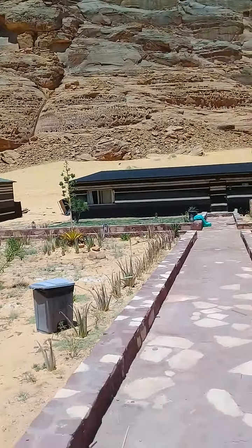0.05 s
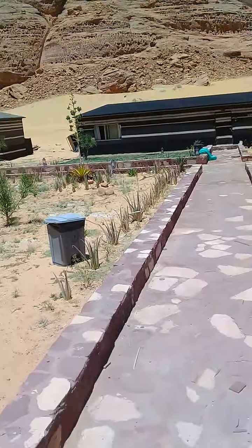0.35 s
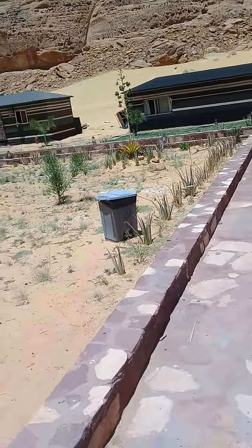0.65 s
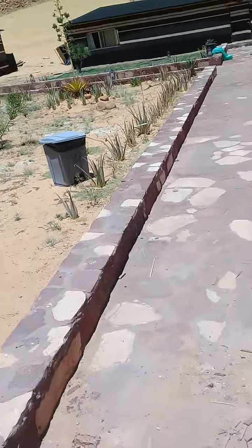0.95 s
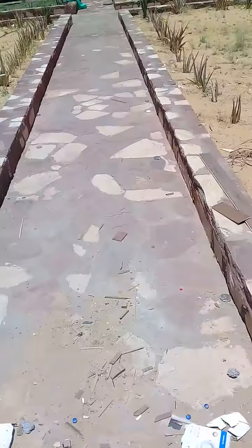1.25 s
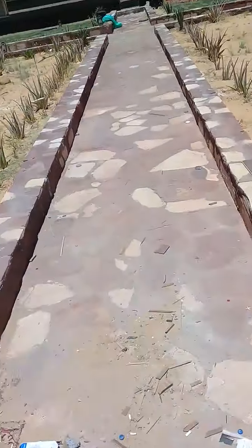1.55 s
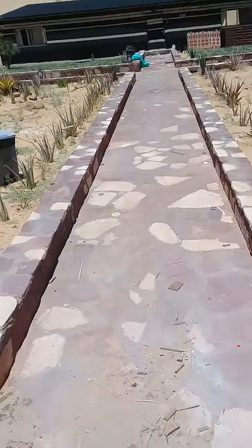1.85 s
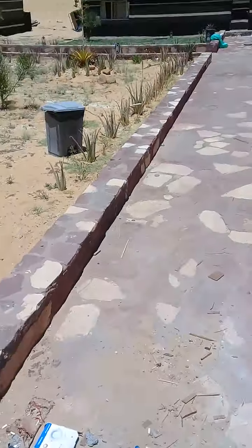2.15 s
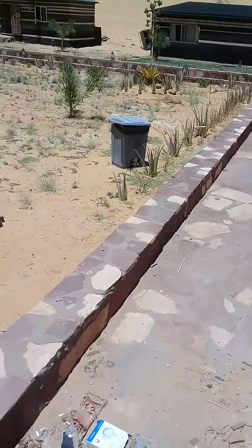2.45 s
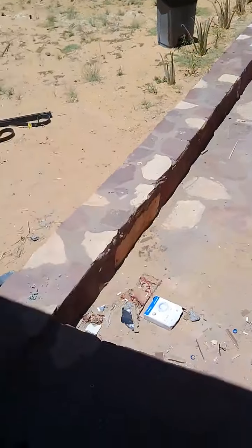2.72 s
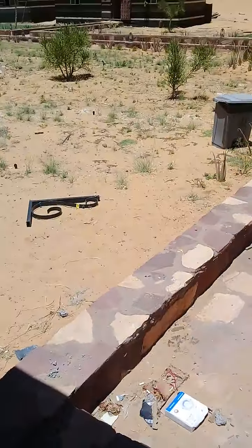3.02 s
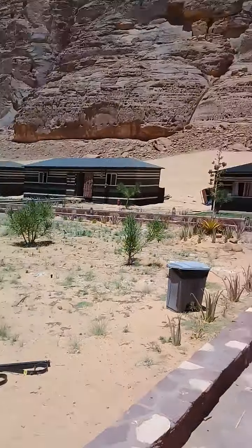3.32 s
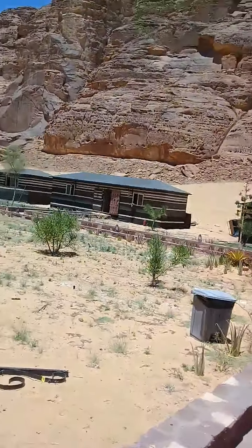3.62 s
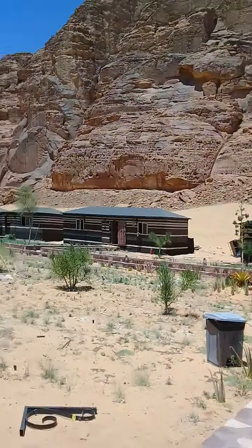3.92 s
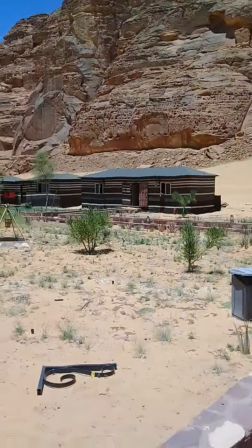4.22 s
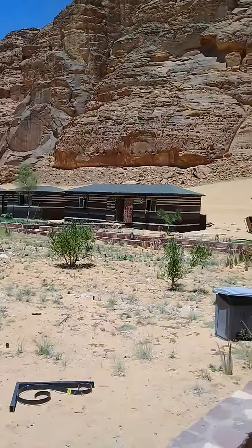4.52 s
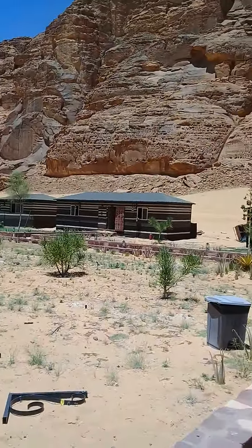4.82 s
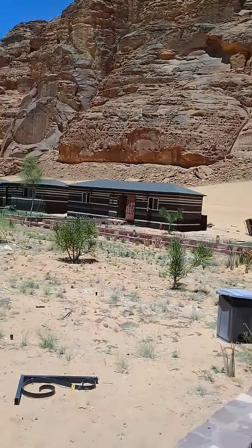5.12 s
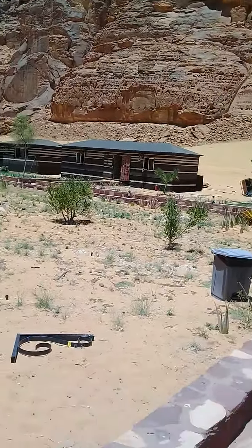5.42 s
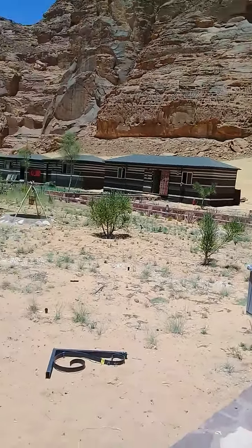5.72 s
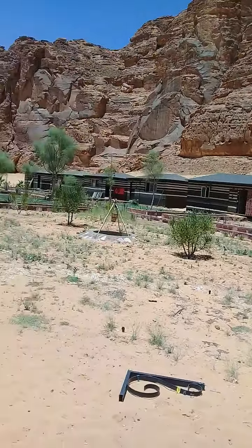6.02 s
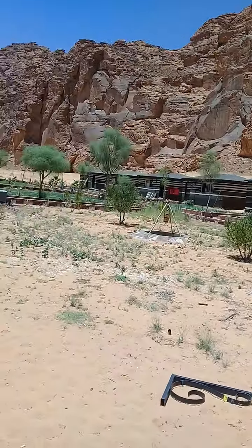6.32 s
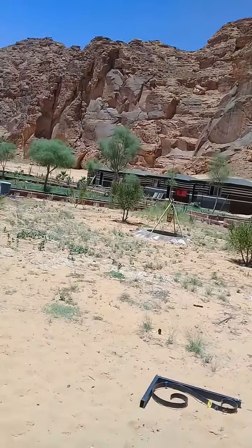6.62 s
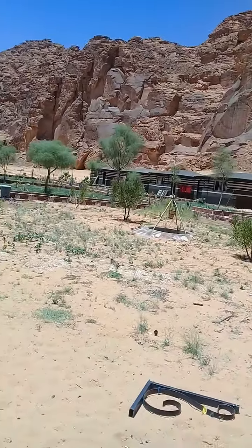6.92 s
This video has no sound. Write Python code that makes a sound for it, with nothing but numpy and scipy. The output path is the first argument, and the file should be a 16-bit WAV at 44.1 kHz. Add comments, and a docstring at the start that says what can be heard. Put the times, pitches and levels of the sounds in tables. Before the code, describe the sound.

Someone shuffles and turns on sand-covered stone in a quiet, open desert place, soles rasping and grit ticking underfoot. The scrapes build to a sandy slide, then a knock with a tiny bright chink as wind buffets the handheld microphone. Afterwards the movement softens to rustling cloth and sand with occasional dull thuds. Still air and a faint low hum lie underneath.

```python
"""Shoes scuff on sandy paving as someone shuffles and turns, phone in hand, in a quiet desert camp.
Each scuff is a swell of sliding grains. Footfalls and handling knocks thud; sleeve and sand rustle,
with one hissing sandy drag; grit ticks and a small hard piece chinks once. Movement and gusts
flutter the air at the microphone port, over still air and a faint low drone. Open ground, no echo."""
import sys
import numpy as np
from scipy import signal
from scipy.fft import rfft, irfft, next_fast_len
from scipy.io import wavfile
from scipy.ndimage import uniform_filter1d

SR = 44100
rng = np.random.default_rng(int(sys.argv[2]) if len(sys.argv) > 2 else 0)


def pcm_store(signal):
    """Save signal as 16-bit PCM."""
    levels = np.round(np.clip(np.atleast_2d(signal), -1, 1) * 32767)
    wavfile.write(sys.argv[1], SR, levels.astype(np.int16).T)


N = 311566
TIME = np.arange(N) / SR

# rustle of sleeve and sand (sandy drag at 3.41-4.03 s), one curve per bout: time_s, level_db
RUSTLE_BOUTS = [
    [(2.39, -48.5), (2.462, -62.5), (2.598, -60.5), (2.632, -50.5), (2.67, -57), (2.77, -61), (2.812, -63),
     (2.82, -57.5)],
    [(3.41, -32.5), (3.592, -38.5), (3.598, -40), (3.716, -43), (3.748, -47.5), (3.806, -46), (3.836, -49),
     (4.03, -38.5)],
    [(4.14, -49), (4.202, -60.5), (4.326, -52.5), (4.352, -58), (4.464, -47.5), (4.634, -58.5),
     (4.646, -66), (4.93, -83)],
    [(4.96, -78), (4.972, -62), (5.038, -71), (5.138, -49), (5.172, -59), (5.318, -41.5), (5.618, -43.5),
     (5.66, -48.5)],
    [(5.66, -51), (5.686, -38), (5.784, -35.5), (5.84, -40.5), (5.874, -32.5), (5.914, -34), (5.94, -41.5)],
    [(5.94, -43), (5.974, -43), (5.982, -38), (6.13, -54), (6.23, -40.5), (6.304, -60), (6.326, -48),
     (6.44, -61)],
    [(6.44, -67), (6.444, -62), (6.576, -56), (6.67, -70), (6.762, -54.5), (6.896, -61.5), (6.902, -63.5),
     (7.04, -54.5)],
]


def scuffs(body_hz=410, body_oct_per_db=0.0557, usual_sand_db=-11, judder_db=1.0, slip_db=2.5):
    """Soles slide: grains rasp, fine sand hisses, the pressed surface sounds hollow."""
    # peak_s, rise_s, fall_s, rasp_db, rasp_hz, body_db, sand_db (last two re rasp)
    strokes = [(0.196, .052, 0.029, -20.5, 1610, -1.5, -16.5), (0.289, 0.064, 0.027, -27.5, 2200, -15, -33),
               (0.33, 0.017, 0.043, -32.5, 1600, -1, -16), (0.393, 0.033, 0.15, -30, 1960, -7, -18),
               (0.507, 0.0052, 0.019, -40, 1700, 13.5, -16), (0.58, .04, .07, -59, 3000, 6.5, -9),
               (0.748, 0.067, 0.016, -51, 3300, 9, -15), (0.822, 0.031, 0.027, -38, 1910, 8, -21),
               (0.927, 0.039, 0.047, -51, 2170, 11.5, -8), (1.039, .006, .057, -47.5, 2600, 15, -24),
               (1.126, 0.036, 0.0094, -36.5, 2600, -2, -5), (1.238, 0.083, 0.092, -34, 1840, -3.5, -8),
               (1.363, 0.03, 0.14, -33, 2000, 3, -9), (1.451, 0.049, .017, -20, 2370, 4, -10.5),
               (1.561, 0.079, .061, -27.5, 2050, -3, -10.5), (1.687, 0.041, .028, -34.5, 1770, 6, -14),
               (1.712, 0.014, 0.045, -17, 1510, -5, -9.5), (1.969, 0.12, 0.16, -40, 1740, -4, -11),
               (2.091, 0.051, 0.014, -29.5, 1930, -3, -10), (2.132, 0.023, 0.085, -40.5, 2200, 6.5, -10),
               (2.201, .015, 0.042, -43, 1530, 9, -23), (2.262, 0.022, 0.052, -21, 1460, -1.5, -8.5),
               (2.346, 0.11, 0.07, -30.5, 2200, 0.5, -5), (2.956, 0.025, .039, -39.5, 2000, 10.5, -15),
               (3.002, 0.052, 0.026, -27.5, 2060, -2, -6), (3.103, 0.037, 0.043, -17, 2200, 2.5, -8),
               (3.248, 0.024, 0.048, -28.5, 1110, 18.5, -31),
               (3.278, 0.047, 0.026, -21.5, 1500, -12, -10.5), (3.32, 0.18, 0.13, -21.5, 2130, -6, -2.5),
               (3.345, 0.02, 0.043, -33.5, 1300, 15, -24), (3.377, 0.046, 0.029, -17.5, 1560, 0, -7),
               (3.615, 0.03, 0.029, -35, 1500, 14.5, -25), (4.061, .075, 0.083, -35.5, 2900, 17.5, -5),
               (5.885, 0.059, 0.05, -29.5, 1880, 4.5, -23), (5.99, .02, .04, -41, 2600, 3, -14)]
    out = np.zeros(N)
    coarse = grains(share=0.1, spread_db=1.5)
    medium = grains(share=0.3, spread_db=1.0)
    fine = grains(share=0.98, spread_db=2.5)
    medium = lowpass(medium, hz=5200, order=4)  # grain contact time limits the treble
    judder = unit(undb(judder_db * walk(rate_hz=350)))  # contact catches and lets go
    pressure = unit(undb(slip_db * walk(rate_hz=110)))
    for peak_s, rise_s, fall_s, rasp_db, rasp_hz, body_db, sand_db in strokes:
        span = slice(max(int((peak_s - 2 * rise_s) * SR), 0), min(int((peak_s + 2 * fall_s) * SR), N))
        extra_sand_db = sand_db - usual_sand_db  # sandier: higher body, slightly narrower rasp
        hollow_hz = body_hz * 2 ** (body_oct_per_db * extra_sand_db)
        rasp = resonate(medium[span], rasp_hz, q=0.51 * 2 ** (0.01 * extra_sand_db))
        body = undb(body_db) * resonate(coarse[span], hollow_hz, q=0.53) * pressure[span]
        hiss = undb(sand_db) * resonate(fine[span], hz=9500, q=0.37)
        out[span] += undb(rasp_db) * swell(TIME[span] - peak_s, rise_s, fall_s) * (rasp + body + hiss)
    return out * judder


def crunch(slides, gain_db=-13):
    """Coarse grains break under a slide, harder when it is louder."""
    treble = colour(slides, [(300, -20), (1500, 0)])
    effort = np.sqrt(np.abs(uniform_filter1d(treble ** 2, size=SR // 50)))
    breaks = grains(share=0.03, spread_db=2.4)
    return undb(gain_db) * effort * resonate(breaks, hz=2600, q=0.77)


def contact(part_s=0.003, return_s=0.019):
    """Slide gain: drops as the rubbing surfaces part, recovers as they meet again."""
    # start_s, depth_db
    lifts = [(0.526, 9), (1.46, 10), (1.747, 19), (2.099, 8), (2.384, 7), (4.084, 17), (5.927, 9.5)]
    gain_db = np.zeros(N)
    for start_s, depth_db in lifts:
        t = np.maximum(TIME - start_s, 0)
        gain_db -= depth_db * (1 - np.exp(-t / part_s)) * np.exp(-(t / return_s) ** 2)
    return undb(gain_db)


def knocks(decay_cycles=0.53, sag_per_cycle=0.053, slap_decay_s=0.0016):
    """Damped thuds sag in pitch as the load eases; hard contacts slap, soft ones build slowly."""
    # footfalls and handling knocks: start_s, level_db, pitch_hz, softness (0 = hard)
    impacts = [(0.0856, -14, 1510, 0.035), (0.1996, -9, 365, 0.73), (1.0851, -8.5, 368, 0.28),
               (1.126, -6.5, 570, 0.058), (1.429, -13.5, 450, .15), (1.4454, -7, 132, 0.49),
               (2.1147, -15, 530, .1), (2.1154, -9.5, 119, 0.53), (2.936, -18, 110, 0.63),
               (3.242, -4.5, 232, 0.16), (3.2497, -7, 290, 0.83), (3.336, -8, 249, 0.56),
               (3.377, -7, 318, 0.55), (3.453, -16, 121, 0.75), (3.6106, -13.5, 392, 0.94),
               (3.624, -8.5, 94, 0.62), (4.0661, -3.5, 223, .12), (4.0897, 2.5, 580, 0.1),
               (4.093, -5.5, 119, 0.76), (4.246, -20, 169, 0.33), (4.608, -27, 111, .8),
               (4.779, -29, 149, 1), (5.4426, -9, 152, 0.76), (5.4444, -11.5, 342, 0.8),
               (6.094, -6, 310, 0.14), (6.101, -17, 80.6, 0.67), (6.145, -28, 65, 0.82),
               (6.544, -24.5, 73.6, .9)]
    out, t = np.zeros(N), TIME[:SR // 8]
    for start_s, level_db, pitch_hz, softness in impacts:
        cycles = pitch_hz * t
        envelope = cycles ** softness * np.exp(-cycles / decay_cycles)
        thud = envelope * np.sin(2 * np.pi * cycles / (1 + sag_per_cycle * cycles))
        slap = undb(-8 - 18 * softness) * burst(t, slap_decay_s, hz=1000, q=0.67)
        add(out, undb(level_db) * (thud / np.abs(thud).max() + slap), start_s)
    return lowpass(out, hz=3000)  # rubber and skin are too soft for high treble


def rustle_motion(settle_s=0.032):
    """Briskness of the rustle as a gain; dies away after each bout."""
    gain = np.zeros(N)
    for bout in RUSTLE_BOUTS:
        time_s, level_db = np.transpose(bout)
        settle = np.exp(-np.maximum(TIME - time_s[-1], 0) / settle_s)
        gain = np.where(TIME >= time_s[0], undb(np.interp(TIME, time_s, level_db)) * settle, gain)
    return np.abs(uniform_filter1d(gain, size=SR // 100))


def rustle(motion, rasp_db=2, body_db=-2, flutter_db=1.88):
    """Sleeve and sand rasp and hiss, hollower when slow; the second bout is a hissing sandy drag."""
    # fine hiss per bout, re its level: gain_db
    hiss_db = [-0.5, -2.5, -8, -11, -12, -11, -12]
    starts_s = [bout[0][0] for bout in RUSTLE_BOUTS]
    bout_index = np.maximum(np.searchsorted(starts_s, TIME) - 1, 0)
    friction = lowpass(grains(share=0.3, spread_db=1.5), hz=5600)
    rasp = undb(rasp_db) * resonate(friction, hz=1900, q=0.48)
    hiss = undb(hiss_db)[bout_index] * resonate(rng.standard_normal(N), hz=9500, q=0.5)
    body = undb(body_db) * resonate(grains(share=0.1, spread_db=1.5), hz=520, q=0.4)
    flutter = unit(undb(flutter_db * walk(rate_hz=40)))
    return (motion * (rasp + hiss) + motion ** 0.8 * body) * flutter


def hand_rubs(half_width_hz=70):
    """Rubbing noise rings in the air pocket under the hand, gliding as the gap changes."""
    # start_s, length_s, level_db, first_hz, last_hz
    glides = [(1.913, .085, -41, 881, 1027), (2.001, 0.08, -39, 914, 748), (2.589, .21, -52, 801, 1135),
              (4.014, 0.061, -23, 520, 820), (5.701, 0.0995, -26.5, 201, 399)]
    out = np.zeros(N)
    for start_s, length_s, level_db, first_hz, last_hz in glides:
        size = int(length_s * SR)
        drive = lowpass(rng.standard_normal((SR // 4, 2)), half_width_hz)[:size]
        phase = 2 * np.pi * np.cumsum(np.linspace(first_hz, last_hz, size)) / SR
        note = unit(drive[:, 0] * np.cos(phase) + drive[:, 1] * np.sin(phase))
        add(out, undb(level_db) * note * signal.windows.tukey(size, 0.5), start_s)
    return out


def grit_ticks(decay_s=0.00046):
    """Single grains give way underfoot, each with a brief broad crack."""
    # start_s, peak_db, pitch_hz
    cracks = [(0.154, -14, 980), (0.505, -21.5, 890), (0.785, -35, 2000), (0.815, -24, 900),
              (1.036, -27.5, 1200), (1.067, -24, 600), (1.125, -11.5, 3120), (1.495, -20, 1600),
              (1.648, -25, 2500), (1.671, -22, 1100), (2.115, -21, 1300), (2.834, -32, 1810),
              (3.679, -16.5, 2190), (3.774, -17, 1100), (6.17, -30, 3500), (6.261, -27, 2200),
              (6.509, -38, 1500), (6.787, -33.5, 6000), (6.885, -27.5, 1200)]
    out, t = np.zeros(N), TIME[:SR // 32]
    for start_s, peak_db, pitch_hz in cracks:
        add(out, undb(peak_db) * burst(t, decay_s, pitch_hz, q=0.65), start_s)
    return out


def chink(start_s=4.0688):
    """A small hard piece, struck by the shoe, rings in short bright modes."""
    # pitch_hz, peak_db, t60_s
    modes = [(2710, -14, 0.022), (3700, -36, 0.01), (6600, -28, 0.034), (6800, -35, .03)]
    out, t = np.zeros(N), TIME[:SR // 10]
    for pitch_hz, peak_db, t60_s in modes:
        add(out, undb(peak_db - 60 * t / t60_s) * np.sin(2 * np.pi * pitch_hz * t), start_s)
    return out


def wind(motion, breeze_db=-55, stirred_db=-6, flutter_db=4.0):
    """Eddies at the microphone port: light breeze, air stirred by movement, gusts."""
    # peak_s, half_length_s, level_db
    gusts = [(1.183, .15, -41), (1.51, 0.22, -35.5), (2.2, 0.24, -35), (3.195, .1, -35), (3.74, 0.29, -27),
             (4.014, 0.17, -21.5), (5.35, 0.43, -37), (6.295, 0.11, -44), (7.0, .35, -44)]
    # freq_hz, gain_db
    eddy_spectrum = [(20, -37), (40, -0.5), (75, -2), (125, 1.5), (190, -1.5), (300, -9), (600, -17),
                     (2000, -77.5)]
    power = undb(breeze_db) ** 2 + (undb(stirred_db) * motion ** 0.75) ** 2
    for peak_s, half_length_s, level_db in gusts:
        power += (undb(level_db) * swell(TIME - peak_s, half_length_s, half_length_s)) ** 2
    eddies = colour(rng.standard_normal(N), eddy_spectrum)
    flutter = undb(flutter_db * walk(rate_hz=55))
    return unit(eddies * flutter) * np.sqrt(power)


def camp(air_db=-51, drone_db=-51, waver_db=1.0):
    """Still desert air and a faint low drone, perhaps a far generator."""
    # freq_hz, gain_db
    air_spectrum = [(20, -17), (55, -12.5), (100, -6), (230, 1), (420, -2), (700, -4.5), (1150, -8.5),
                    (1900, -13.5), (2900, -18), (6300, -28), (9000, -34), (15000, -39)]
    waver = undb(waver_db * walk(rate_hz=14))
    air = unit(colour(rng.standard_normal(N), air_spectrum)) * waver
    drone = resonate(rng.standard_normal(N), hz=56.4, q=6)
    return undb(air_db) * air + undb(drone_db) * drone


def grains(share, spread_db):
    """Dense tiny impacts on a share of the samples: many weak, a few strong."""
    strength = undb(spread_db * np.minimum(rng.exponential(size=N), 6))
    return rng.standard_normal(N) * strength * (rng.random(N) < share)


def burst(t, decay_s, hz, q):
    """Decaying noise through a resonance; peak 1."""
    noise = resonate(rng.standard_normal(len(t)) * np.exp(-t / decay_s), hz, q)
    return noise / np.abs(noise).max()


def swell(t, rise_s, fall_s):
    """Gain peaking at t = 0; 20 dB down at -rise_s and at fall_s."""
    distance = np.abs(t / np.where(t < 0, rise_s, fall_s))
    return undb(-20 * distance ** np.where(t < 0, 1.39, 1.48))


def walk(rate_hz):
    """Random wander, rate_hz new goals a second; rms 1."""
    goals = rng.standard_normal(N // 16)
    return unit(np.interp(TIME * rate_hz, np.arange(len(goals)), goals))


def resonate(x, hz, q):
    """Band-pass applied twice for steep skirts; rms 1."""
    size = next_fast_len(len(x))
    ratio = np.maximum(np.fft.rfftfreq(size, 1 / SR), 1) / hz
    return unit(irfft(rfft(x, size) / (1 + 1j * q * (ratio - 1 / ratio)) ** 2, size)[:len(x)])


def colour(x, points):
    """Filter by a curve of (freq_hz, gain_db) points."""
    freq_hz, gain_db = np.transpose(points)
    size = next_fast_len(len(x))
    bins_hz = np.maximum(np.fft.rfftfreq(size, 1 / SR), 1)
    gain = undb(np.interp(np.log(bins_hz), np.log(freq_hz), gain_db))
    return irfft(rfft(x, size) * gain, size)[:len(x)]


def lowpass(x, hz, order=2):
    return signal.sosfilt(signal.butter(order, hz, fs=SR, output="sos"), x, axis=0)


def undb(db):
    return 10 ** (np.asarray(db) / 20)


def unit(x):
    """Scale to rms 1."""
    return x / np.sqrt(np.mean(x ** 2) + 1e-18)


def add(track, sound, start_s):
    start = int(start_s * SR)
    track[start:start + len(sound)] += sound[:N - start]


def scene():
    """All sources at one microphone."""
    motion = rustle_motion()
    slides = scuffs() + rustle(motion)
    rubbing = (slides + crunch(slides)) * contact()
    return (rubbing + hand_rubs() + knocks() + grit_ticks() + chink() + wind(motion) + camp())[None]


def record(dry):
    """The phone colours the sound, clips at full scale and cuts the top."""
    # freq_hz, gain_db
    mic_response = [(30, 1), (150, 1.5), (270, 2), (420, 0.5), (750, 0.5), (1200, 0.1), (1900, -0.5),
                    (2900, -0.16), (4400, -0.76), (6300, 1.5), (9000, 1.2), (11500, 1), (15500, -4.5)]
    clipped = np.clip(colour(dry[0], mic_response), -1, 1)
    top_cut = signal.ellip(10, 0.2, 70, 15850, fs=SR, output="sos")
    return signal.sosfilt(top_cut, clipped)[None]


dry = scene()
out = record(dry)
pcm_store(out)
```